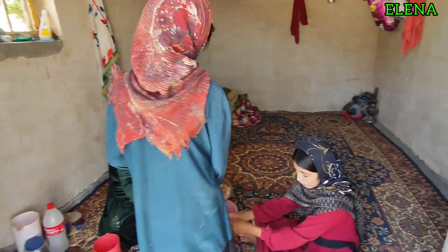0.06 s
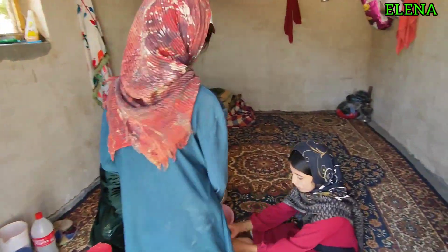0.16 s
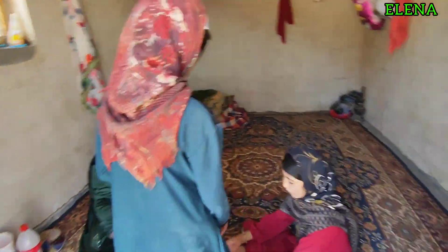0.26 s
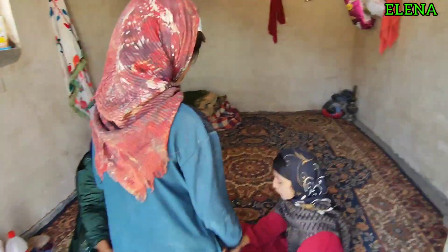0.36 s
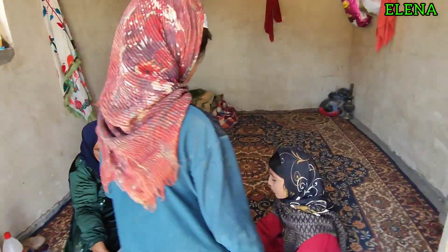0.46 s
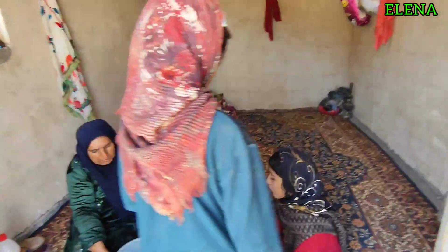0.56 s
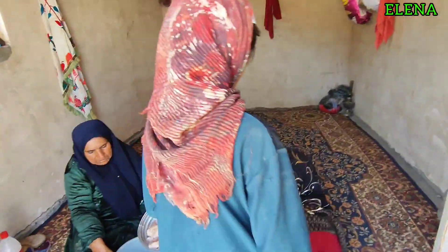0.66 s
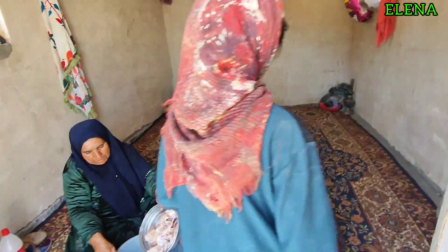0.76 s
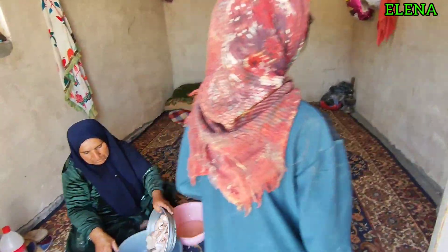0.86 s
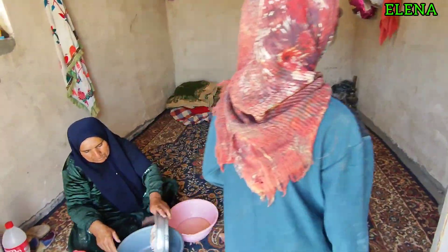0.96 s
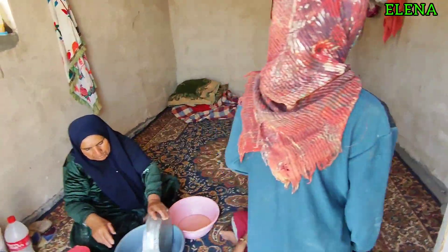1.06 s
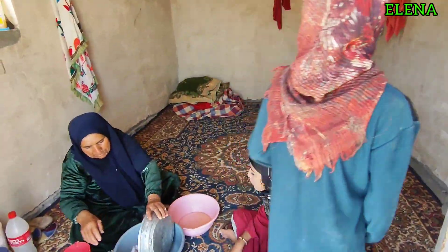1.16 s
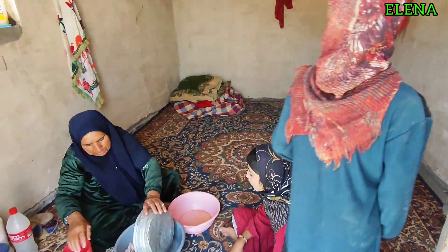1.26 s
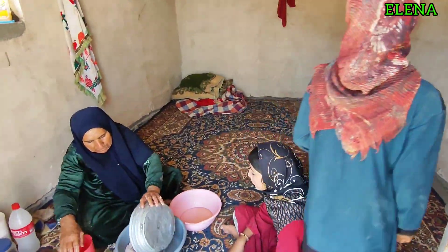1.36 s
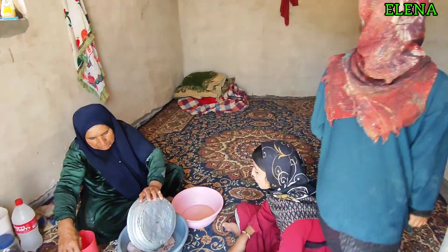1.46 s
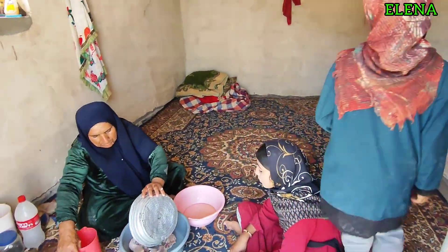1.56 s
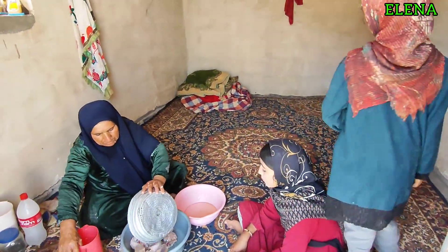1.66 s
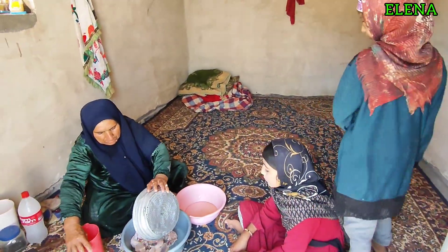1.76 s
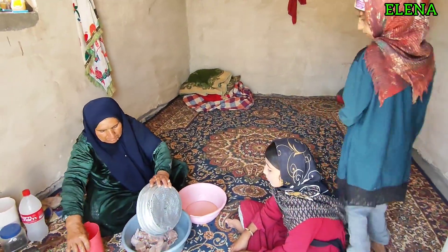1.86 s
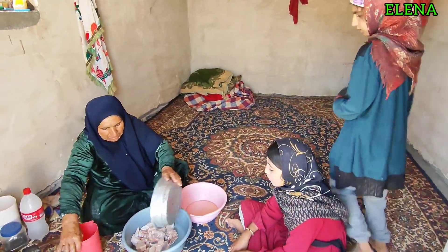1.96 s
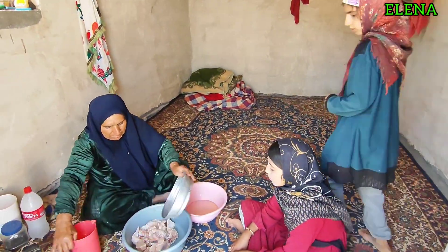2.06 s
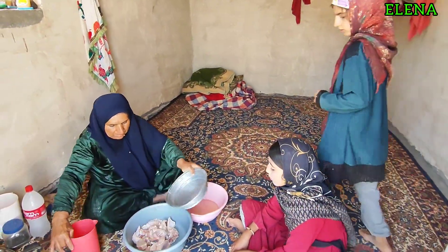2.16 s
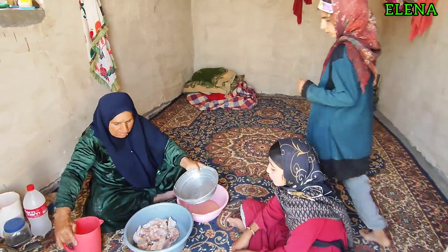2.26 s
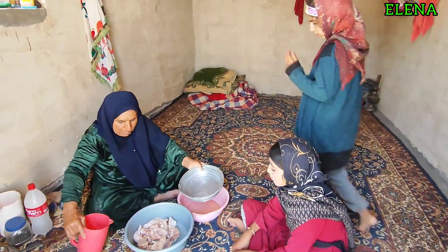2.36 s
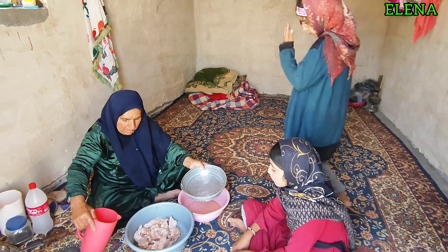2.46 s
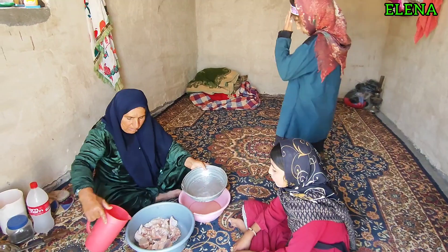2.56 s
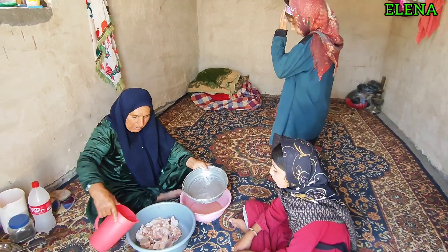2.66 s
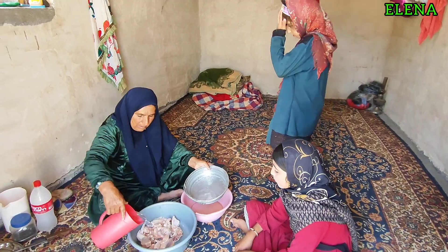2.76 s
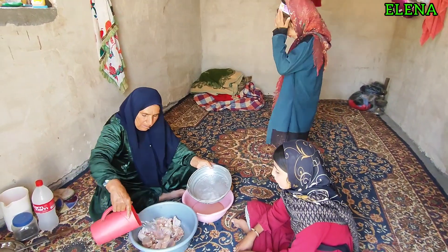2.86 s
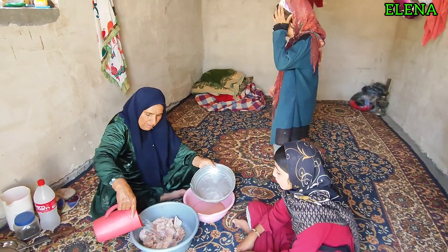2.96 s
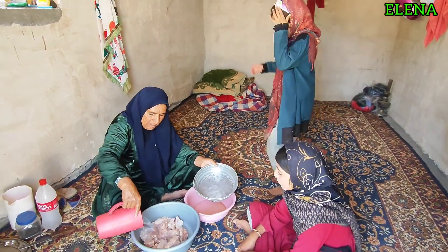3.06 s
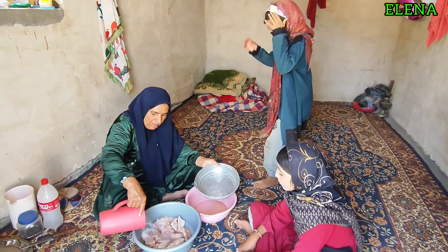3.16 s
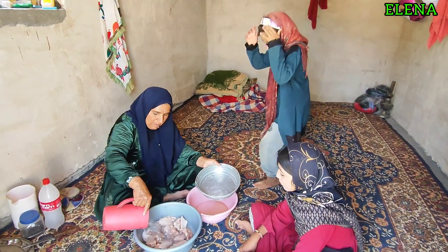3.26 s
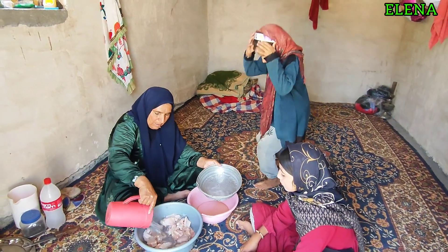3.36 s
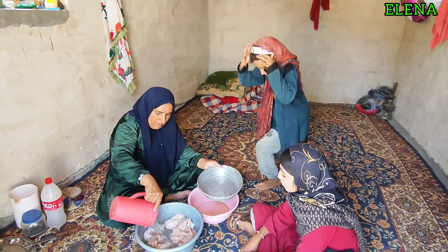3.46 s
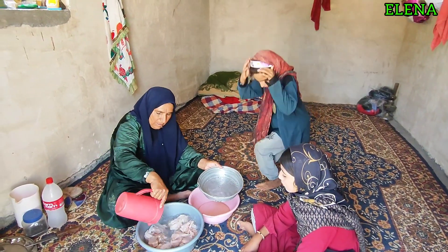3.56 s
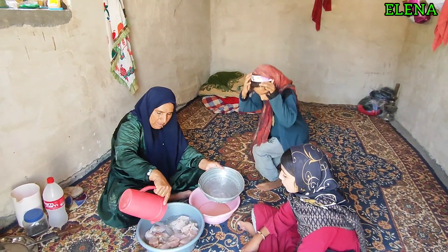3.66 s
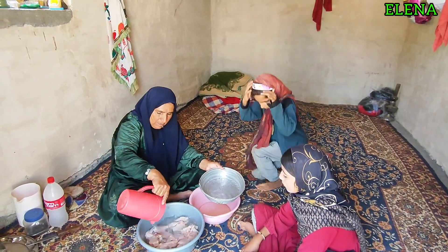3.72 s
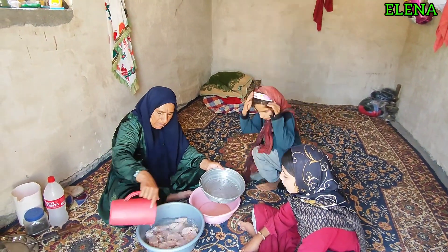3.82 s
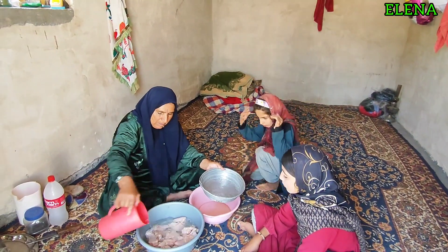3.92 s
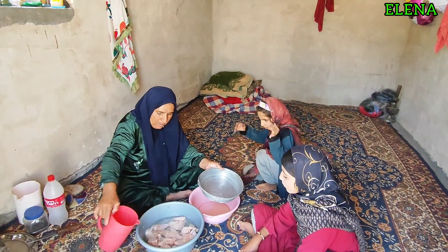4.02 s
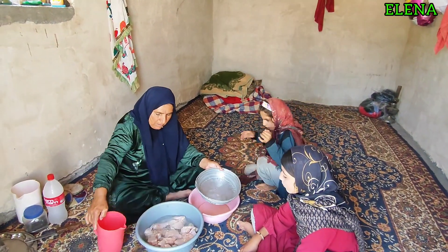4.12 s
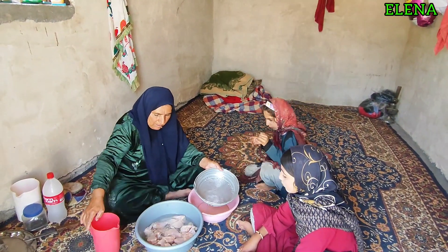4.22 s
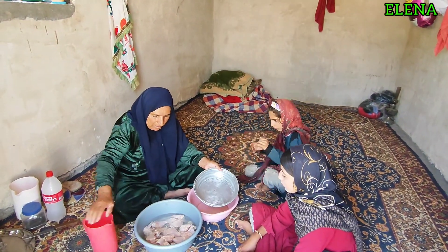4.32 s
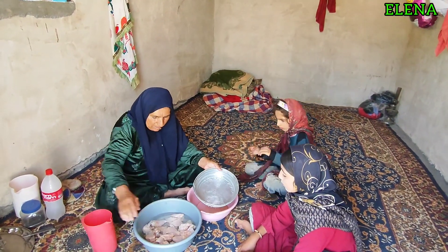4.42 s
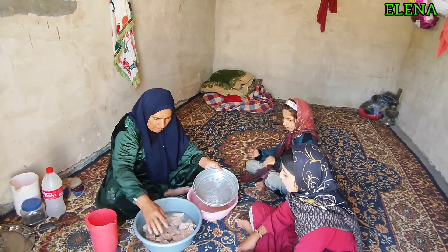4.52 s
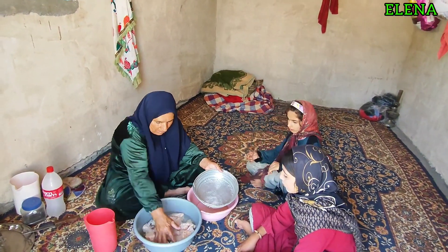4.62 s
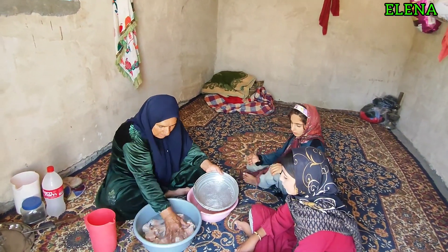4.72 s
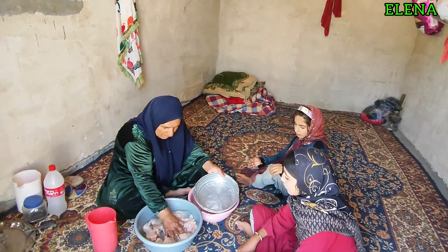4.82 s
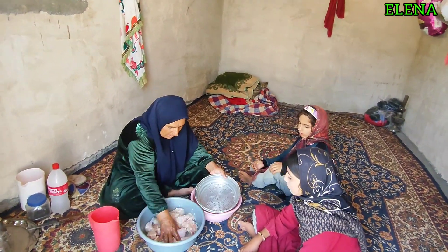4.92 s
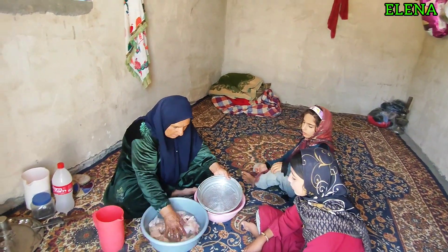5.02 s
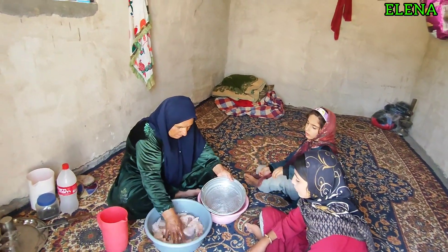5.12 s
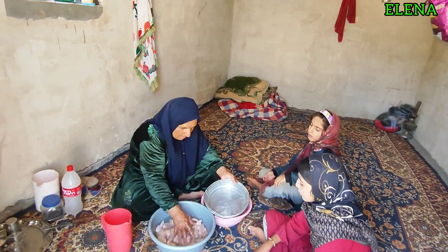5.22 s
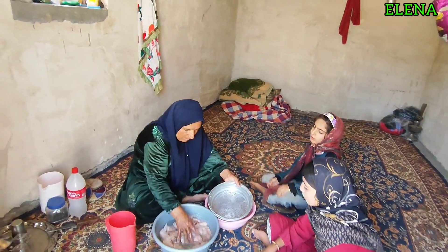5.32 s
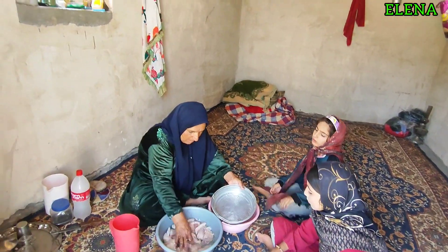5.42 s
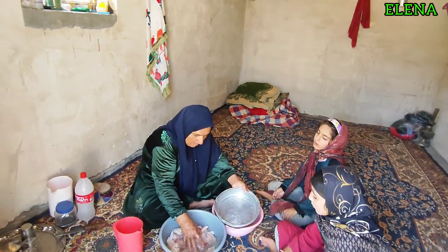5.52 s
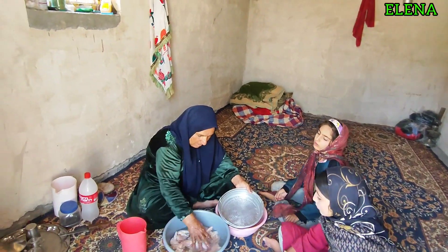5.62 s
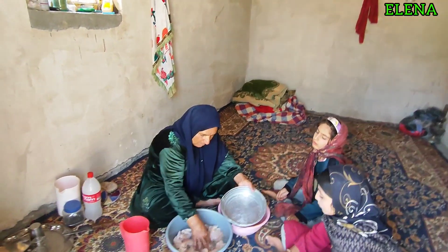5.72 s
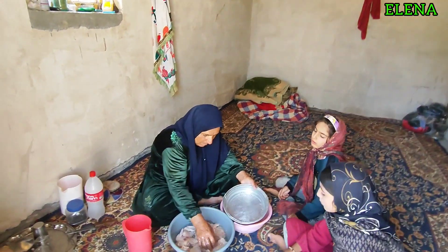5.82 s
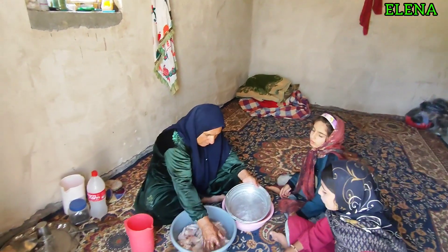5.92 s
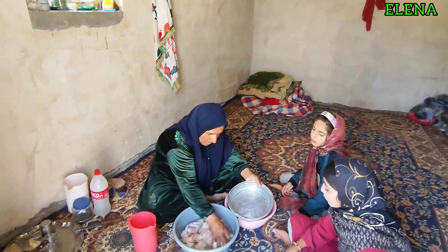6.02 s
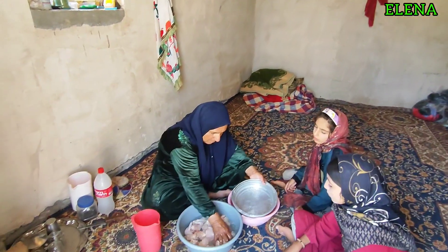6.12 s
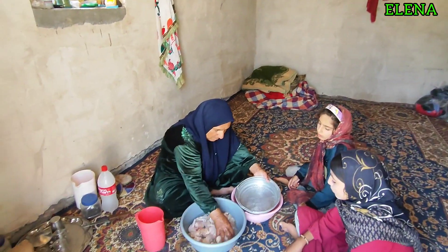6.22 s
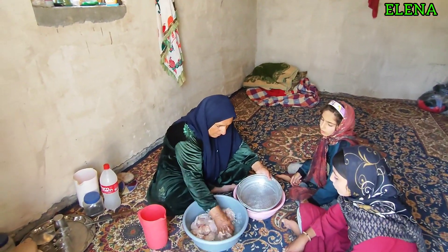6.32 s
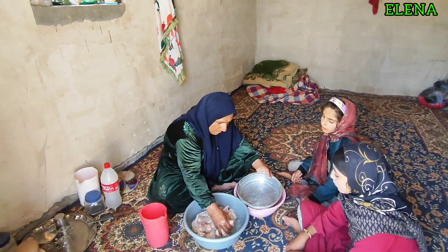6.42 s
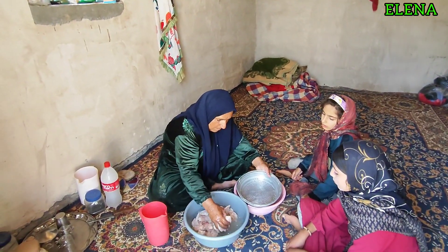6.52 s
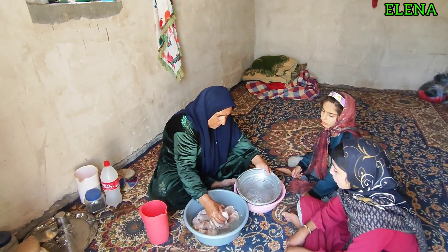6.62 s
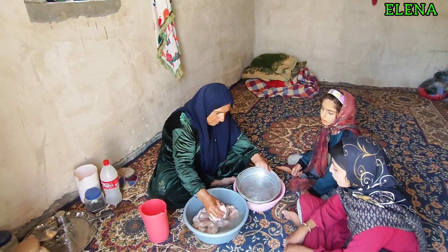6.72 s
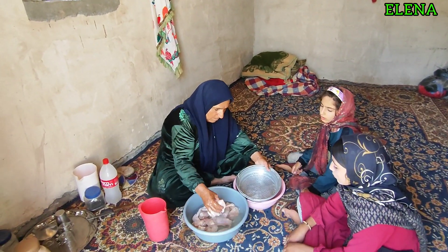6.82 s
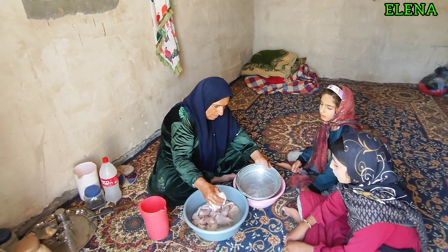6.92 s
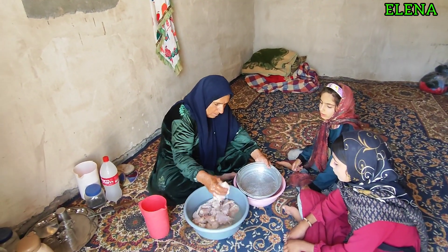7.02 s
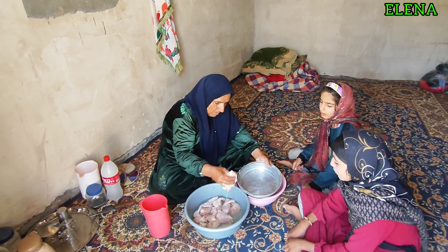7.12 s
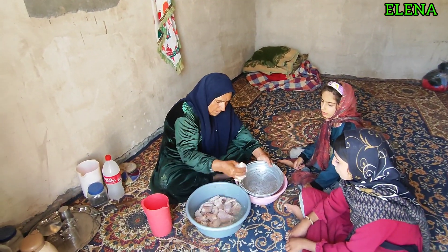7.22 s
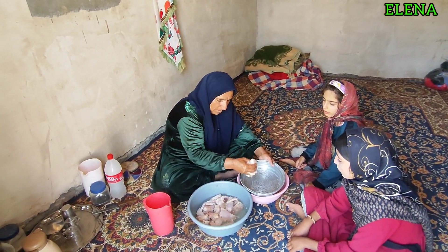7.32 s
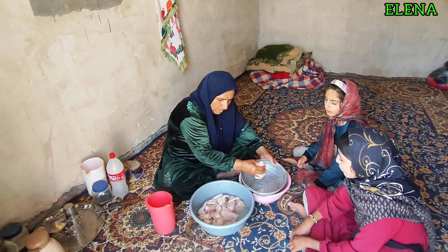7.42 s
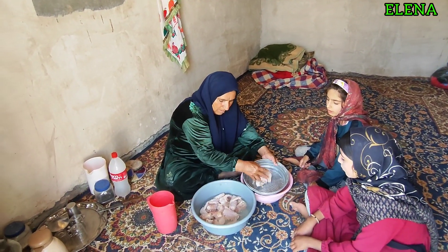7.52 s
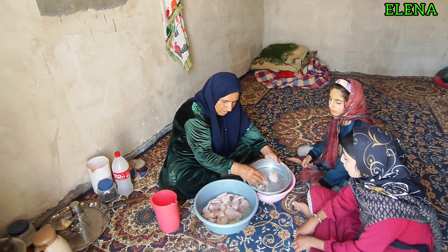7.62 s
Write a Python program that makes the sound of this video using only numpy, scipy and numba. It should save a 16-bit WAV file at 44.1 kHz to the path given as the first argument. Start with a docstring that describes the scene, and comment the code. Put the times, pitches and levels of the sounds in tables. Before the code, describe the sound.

In a small bare room, heard close in stereo, a steel bowl clanks, thumps and scrapes on a plastic basin while soft steps pass on carpet. A jug pours a short bubbling stream over meat and is set down with a dull knock. A hand then sloshes the water in irregular bursts, with plops and fine spray, calming to drips before a last bright metal knock.

```python
"""Water poured and sloshed by hand over meat in a plastic basin, on the carpet of a small bare room, heard close
through two microphone ports: crowds of short rings that climb in pitch, single bubbles, slaps and treble puffs.
A steel bowl knocks and thumps the basin (clicks striking modes) and slides on it (crowds of steady rings).
The jug is set down and soft footfalls pass; dense echoes and a flickering hush of noise lie behind."""
import sys
import numpy as np
from scipy import signal
from scipy.fft import rfft, irfft, next_fast_len
from scipy.io import wavfile
from numba import njit

SR = 44100
rng = np.random.default_rng(int(sys.argv[2]) if len(sys.argv) > 2 else 0)


def wrap_up_sound(samples):
    """Save the sound to the file named by the first command line argument, as 16-bit audio."""
    columns = np.atleast_2d(samples).T
    # keep every value between -1 and 1, then stretch to whole-number steps
    tamed = np.clip(columns, -1, 1)
    steps = np.round(tamed * 32767).astype(np.int16)
    wavfile.write(sys.argv[1], SR, steps)


def linear_from_db(decibels):
    """Turn decibels (scalar or array-like) into linear amplitude factors; 0 gives 1."""
    return 10 ** (np.asarray(decibels, float) / 20)


N = 338688   # samples, 7.68 s

# Levels of the sources are those before the direct gain in scene().
# Hush of the room. Each row: frequency in Hz, relative level in dB per Hz.
HUSH_COLOUR = [(15, -35), (25, -4), (71, 0.5), (157, 1), (387, -7.5), (505, -6.5), (1040, -16),
               (2430, -15.5), (3080, -22), (4240, -17.5), (6670, -22), (7620, -16.5), (9180, -7.5),
               (11700, -20), (14400, -16.5)]
# Level of the treble hiss, which rises and falls with the scraping and the water.
# Each row: time in seconds, level in dB.
HISS_LEVEL = [(0.0, -67.5), (0.9, -69), (1.07, -58), (1.22, -52.5), (1.32, -67.5), (2.35, -74.5),
              (2.84, -74.5), (3.06, -61), (3.57, -59.5), (4.0, -62.5), (4.62, -64.5), (5.0, -62),
              (5.92, -66), (6.22, -65), (6.56, -70), (7.0, -68.5), (7.68, -71)]
# Likeness of the hush at the two ports. Each row: frequency in Hz, left-right likeness from 0 to 1.
PORT_LIKENESS = [(60, 0.43), (150, 0.83), (370, 0.69), (920, 0.078), (2270, 0.06), (5640, 0.033),
                 (14000, 0.02)]
# Echoes of the small room. Each row: frequency in Hz, decay by 60 dB in seconds.
ROOM_T60 = [(100, 0.33), (500, 0.21), (2000, 0.17), (8000, 0.078)]
# The microphone turns slowly. Each row: time in seconds, delay of the right port in seconds.
RIGHT_LAG = [(0, 0.00016), (1.5, 0.00013), (2.2, 0.0005), (3.4, 0.0004), (4.5, 0.00022), (5.5, 0.00013),
             (7.68, 0.000011)]
# Colour of the microphone, with the top cutoff of the whole sound above 14.4 kHz.
# Each row: frequency in Hz, gain in dB.
MICROPHONE_AND_CUTOFF = [(100, 0.5), (6300, 0.5), (7700, -11.5), (8700, -7.5), (9400, -0.5), (10600, -4.5),
                         (11900, 0), (13200, -6), (14300, -2), (14700, -46)]
# Balance of the ports. Each row: frequency in Hz, left minus right in dB.
PORT_BALANCE = [(60, 1.5), (98, 2), (160, -1), (270, 1), (440, -5), (710, 2.5), (1170, 0), (1930, -2.5),
                (3160, -3.5), (5190, 2), (8520, -12), (14000, -5.5)]

# Soft footfalls on the carpet. Each row: start in seconds, peak in dB, length in seconds, centre in Hz.
FOOTFALLS = [(1.291, -45.5, 0.03, 45.8), (1.929, -56.5, 0.081, 99.6), (2.264, -54.5, 0.05, 53.8),
             (3.775, -51, 0.048, 56.5), (3.869, -71, 0.05, 99.6), (4.074, -47.5, 0.072, 93),
             (7.582, -49, 0.039, 53.5), (7.63, -57, 0.05, 48.4)]
# Jug set down. Each row: start in seconds, peak in dB, rattle length in seconds, contact centre in Hz.
JUG_KNOCKS = [(4.053, -51, 0.001, 380), (4.197, -27.5, 0.00061, 346), (4.226, -29.5, 0.0011, 358)]
# Modes of the jug. Each row: frequency in Hz, relative level in dB, decay by 60 dB in seconds.
JUG_MODES = [(91, -25, .2), (124, 10.5, 0.17), (176, -8, 0.082), (240, 1.5, 0.056), (294, -14, 0.089),
             (361.5, 13.5, 0.11), (427, -8, 0.28)]
# Basin thumps. Each row: start in seconds, peak in dB, rattle length in seconds, contact centre in Hz.
BASIN_KNOCKS = [(0.245, -27.5, 0.0073, 254), (0.379, -22.5, 0.0031, 230), (0.459, -34.5, 0.0044, 334),
                (0.62, -48, 0.0038, 460), (1.115, -25, 0.0031, 268), (1.136, -28, 0.0075, 205),
                (1.168, -33, 0.0053, 494), (1.466, -31.5, 0.0023, 338), (2.722, -46.5, 0.0056, 490)]
# Modes of the basin. Each row: frequency in Hz, relative level in dB, decay by 60 dB in seconds.
BASIN_MODES = [(125.2, -0.5, 0.3), (183, 5, 0.087), (216.8, -2.5, 0.34), (239, 6, 0.15), (308.7, 1, 0.09),
               (348, 9, 0.039), (427, -21, 0.27), (653, -5, 0.048), (890, -12, 0.06)]
# Steel bowl knocks. Each row: start in seconds, peak in dB, rattle length in seconds, contact centre in Hz.
BOWL_KNOCKS = [(0.248, -20.5, 0.009, 1200), (0.867, -30.5, 0.034, 3070), (0.903, -21, 0.0045, 525),
               (0.97, -27.5, 0.0032, 590), (1.085, -32.5, 0.0089, 1340), (1.138, -20, 0.0028, 1050),
               (1.176, -35, 0.008, 511), (1.207, -26, 0.0092, 1100), (1.467, -37, 0.0046, 470),
               (1.737, -45, 0.0059, 1400), (2.717, -35.5, 0.0061, 910), (7.56, -19, 0.009, 2080),
               (7.616, -26.5, 0.0052, 520)]
# Modes of the bowl. Each row: frequency in Hz, relative level in dB, decay by 60 dB in seconds.
BOWL_MODES = [(499, 0, 0.12), (536, -1, 0.1), (642, -10, 0.17), (860, -24, 0.11), (983, -7, 0.038),
              (1157, 3.5, 0.032), (1400, -1.5, 0.03), (1620, -10, 0.057), (2230, -19, 0.032),
              (2490, -7, 0.026), (2570, -17, 0.033), (3040, -10.5, 0.094), (3110, -4.5, 0.048),
              (3900, -23, 0.028), (4510, 7.5, 0.012), (5700, -48, 0.023), (6700, -22, .03)]

# Bowl and wet meat slide. Each row: start in seconds, hold in seconds, level in dB,
# decay by 60 dB in seconds, brightness in dB.
SLIDES = [(.245, 0.0089, -30, 0.19, -0.7), (.38, .005, -43, 0.077, -8), (.4, 0.13, -51.5, 0.31, -2),
          (.61, 0.011, -58, 0.54, 0), (.865, 0.024, -57, 0.064, 20.5), (.903, 0.0042, -34, 0.13, -6),
          (.966, 0.0045, -38.5, 0.19, -1), (1.0, 0.036, -57.5, .3, 11), (1.04, 0.044, -56, 0.23, 15.5),
          (1.082, .02, -50, 0.27, 6), (1.135, 0.0044, -43.5, 0.43, -16), (1.15, 0.056, -38.5, 0.29, -0.8),
          (1.33, 0.052, -60, .3, 2.5), (1.462, .005, -56.5, 0.85, 0.1), (1.595, 0.0071, -67, 0.21, 21.5),
          (1.63, 0.017, -59.5, 0.53, -10.5), (1.71, 0.032, -55, 0.13, 8.5), (1.735, 0.0034, -42, 0.093, -1),
          (1.85, 0.205, -68, 0.24, 7), (2.085, .005, -67, .08, 16.5), (2.15, 0.055, -64.5, 0.21, 11),
          (2.25, 0.17, -72, 0.49, -1), (2.715, 0.0038, -44.5, 0.12, 1), (7.493, .01, -55.5, 0.22, 10),
          (7.555, 0.0038, -32, 0.15, 3), (7.61, 0.026, -48.5, 0.2, -3)]
# Basin body, middle, steel scrape, wet hiss. Each row: dB against the stroke level, share of the brightness.
SLIDE_RANGES = [(-5, -0.67), (0, 0.067), (-6.5, 1.01), (-14, 1.25)]
# Colour of the sliding. Each row: frequency in Hz, relative level in dB per Hz.
SLIDING_COLOUR = [(71, -34), (120, 1), (302, 1), (805, -3), (984, -30), (1180, -10), (1590, -13.5),
                  (6100, -37.5), (7600, -42), (12000, -50.5), (14400, -38)]

# Water slapping on meat and basin wall. Each row: start in seconds, peak in dB, length in seconds, centre in Hz.
SLAPS = [(2.899, -36.5, 0.0086, 1990), (2.983, -34, .016, 2160), (3.255, -32.5, .012, 1900),
         (3.39, -39, .008, 2300), (3.707, -37, .017, 1920), (4.882, -53, .014, 880),
         (5.016, -35, .0078, 2190), (5.049, -33, .0088, 1890), (5.327, -34.5, 0.013, 2170),
         (5.377, -36, 0.0032, 800), (5.422, -38, 0.021, 1810), (5.683, -36, .008, 4500),
         (5.914, -39, 0.025, 1190), (6.099, -32.5, 0.0092, 910), (6.271, -21, 0.0056, 4600),
         (6.437, -44, 0.013, 802), (7.431, -42.5, 0.0011, 1080)]
# Short treble puffs, mostly fine spray, some from the bowl scraping and knocking.
# Each row: start in seconds, peak in dB.
TREBLE_PUFFS = [(1.7114, -45), (2.1833, -45.5), (2.878, -44), (3.075, -36.5), (3.403, -40), (3.694, -39),
                (3.996, -42), (4.717, -38), (4.83, -43), (4.877, -38.5), (4.96, -44), (5.013, -34),
                (5.124, -42), (5.182, -35.5), (5.33, -42), (5.3781, -38.5), (5.407, -30), (5.631, -38),
                (5.69, -42), (5.771, -39.5), (6.0735, -44.5), (6.165, -36), (6.27, -23), (6.465, -46),
                (6.56, -44.5), (6.714, -50), (6.75, -48), (7.037, -48), (7.177, -44.5), (7.357, -40),
                (7.4935, -34.5), (7.555, -26)]
# Single bubbles and drops. Each row: start in seconds, level before decay in dB,
# pitch a fifth of the way through the ring in Hz, decay by 60 dB in seconds.
BUBBLES = [(2.792, -46, 1260, 0.023), (2.8577, -44.5, 4160, 0.063), (2.8987, -34, 2080, 0.059),
           (2.991, -36.5, 800, .076), (3.2595, -30, 2030, 0.026), (3.3502, -37.5, 2660, 0.034),
           (3.394, -35, 2570, .028), (3.401, -30, 847, 0.057), (3.61, -39.5, 2780, 0.055),
           (3.67, -40, 598, 0.08), (3.7083, -32.5, 1960, .028), (3.745, -34.5, 2630, 0.042),
           (3.85, -44.5, 4060, 0.054), (4.702, -33, 377, 0.048), (4.7823, -36, 1340, .033),
           (4.8396, -33, 1750, .04), (4.93, -36, 3200, 0.046), (4.888, -31.5, 462, 0.062),
           (5.009, -31, 528, 0.023), (5.011, -31.5, 970, 0.038), (5.0173, -31, 2230, .04),
           (5.049, -25.5, 1930, 0.022), (5.126, -31, 375, 0.04), (5.145, -43, 4180, .054),
           (5.3635, -45, 2020, .043), (5.377, -39.5, 844, 0.13), (5.4174, -40, 1850, .067),
           (5.4927, -33, 3400, .032), (5.569, -43, 487, 0.05), (5.597, -44, 1840, .033),
           (5.629, -34.5, 1830, 0.096), (5.7581, -44, 1855, 0.072), (5.775, -43, 2500, 0.064),
           (5.81, -40, 2820, 0.043), (5.8514, -40.5, 1990, 0.023), (5.911, -21, 456, 0.027),
           (5.9144, -44, 1296, 0.078), (5.9661, -45, 2510, 0.032), (6.072, -23, 376, 0.031),
           (6.1225, -35, 1800, 0.033), (6.2133, -33.5, 1556, .049), (6.249, -38, 904, .059),
           (6.2585, -35, 1860, 0.037), (6.558, -45.5, 1857, 0.1), (6.816, -46, 2840, 0.027),
           (6.918, -61, 2500, 0.023), (6.954, -47.5, 2740, 0.048), (7.0352, -53, 4580, .04),
           (7.0866, -53, 2850, 0.11), (7.1732, -53, 1410, .019)]
# Stream from the jug. Each row: time in seconds, level in dB,
# then against that level: large bubbles in dB, fizz in dB.
POUR = [(2.8, -81, 0.1, -9), (2.85, -64, -18, 5), (2.9, -48, -12.5, -4.5), (2.98, -46, -3, -4),
        (3.06, -45, -14, -10), (3.14, -43.5, -10, -10.5), (3.25, -47, -1.5, -12), (3.37, -46.5, -5, -10),
        (3.47, -46, -1.5, -8), (3.56, -49.5, -4, -16.5), (3.72, -46, -6.5, -4.5), (3.78, -51.5, -14, -1),
        (3.86, -59, -11, -8), (4.0, -66.5, -0.5, -18), (4.25, -81, 3, 16)]
# The water surges, first under the stream, then under the hand. Each row: start in seconds, hold in seconds,
# level in dB, decay by 60 dB in seconds, brightness in dB.
SLOSHES = [(2.79, 0.013, -69.5, 0.12, -25.5), (3.385, 0.016, -40.5, 0.3, 0), (3.7, 0.016, -51.5, 0.26, -5),
           (4.62, 0.19, -58.5, .3, 7), (4.7, 0.094, -51, .3, -3), (4.835, 0.043, -45.5, 0.23, 5.5),
           (4.88, 0.021, -43.5, 1.02, -2), (5.0, 0.037, -44, 0.29, 2.8), (5.12, .07, -48, 1.5, 1),
           (5.3, .005, -50, 0.16, -6.5), (5.36, 0.031, -45, .3, 3.5), (5.41, 0.023, -45, 0.34, 2.5),
           (5.53, 0.078, -56.5, .3, 2), (5.628, 0.004, -49, 0.061, 3), (5.68, 0.036, -50.5, 0.092, 5.5),
           (5.73, .14, -59.5, .07, 1.5), (5.91, 0.07, -54.5, 0.71, -9.5), (6.0, 0.092, -50, 0.59, 2),
           (6.09, 0.075, -47.5, 0.23, -9), (6.2, 0.046, -48.5, .3, 0.5), (6.24, 0.035, -42.5, .45, -3.5),
           (6.33, 0.038, -51.5, .45, 2.5), (6.435, 0.12, -58.5, 0.14, -6), (6.81, 0.016, -64, 0.098, 8),
           (6.95, 0.014, -63, 0.085, 8), (7.09, .04, -62, 0.33, 11), (7.2, 0.038, -76, 0.36, -25.5),
           (7.35, .02, -73, .2, 18)]
# Large bubbles, middle, fizz, finest fizz. Each row: dB against the surge level, share of the brightness.
SLOSH_RANGES = [(-6.5, -0.97), (-1, -0.24), (-10.5, 1), (-13, 0.72)]
# Colour of the water. Each row: frequency in Hz, relative level in dB per Hz.
WATER_COLOUR = [(150, -38), (250, -7.5), (470, -6), (760, -7), (1500, -5), (2000, -5.5), (3500, -10.5),
                (4200, -12), (5000, -17.5), (8000, -13.5), (14400, -22), (15000, -40)]

EDGES_HZ = 25 * 2 ** np.arange(0, 9.6, .5)   # half-octave bands


def rms_one(x):
    """Scales a signal to an rms of one."""
    return x / np.sqrt(np.mean(x ** 2) + 1e-20)


def at_hz(points, hz):
    """Reads a table at a frequency, along a logarithmic frequency axis."""
    table = np.array(points)
    return np.interp(np.log(hz), np.log(table[:, 0]), table[:, 1])


def band(x, low_hz, high_hz):
    """Keeps the sound between two frequencies."""
    return signal.sosfilt(signal.butter(2, [low_hz, high_hz], "band", fs=SR, output="sos"), x)


def over_time(s, values, outside=None):
    """Joins timed values by lines, one value per sample."""
    return np.interp(np.arange(N) / SR, s, values, outside, outside)


def drift(rate):
    """Slow random wander of rms one: rate random points a second, joined by lines."""
    count = int(N / SR * rate) + 2
    return rms_one(over_time(np.arange(count) / rate, rng.standard_normal(count)))


def lag_at(s, spread_s):
    """Samples by which the right port is late, for sources spread over the width of the basin."""
    lag_s = np.interp(s, *np.transpose(RIGHT_LAG)) + spread_s * (2 * rng.random(np.shape(s)) - 1)
    return np.clip(np.round(lag_s * SR), -40, 40).astype(int)


def hush():
    """Half-octave bands of flickering noise; the treble hiss rises and falls with the scraping and the water."""
    rumble_db, middle_db = -61, -65
    levels = [linear_from_db(rumble_db), linear_from_db(middle_db), linear_from_db(over_time(*np.transpose(HISS_LEVEL)))]
    zones = np.zeros((3, 2, N))
    white = rng.standard_normal((2, 2, N))
    for k, (low, high) in enumerate(zip(EDGES_HZ, EDGES_HZ[1:])):
        mid, side = band(white[k % 2], low, high)
        hz = np.sqrt(low * high)
        alike = np.clip(at_hz(PORT_LIKENESS, hz), -1, 1)
        ports = np.sqrt(1 + alike) * mid + np.sqrt(1 - alike) * side * [[1], [-1]]
        flicker_db = 2.04 * drift(8.3)
        zones[np.digitize(hz, [250, 5000])] += linear_from_db(at_hz(HUSH_COLOUR, hz) + flicker_db) * ports
    return sum(level * zone / np.std(zone.mean(axis=0)) for level, zone in zip(levels, zones))


def room(x):
    """Dense echoes: noise that dies band by band at each port, building up over the first milliseconds."""
    alike_below_hz, build_up_s = 600, 0.0077
    t = np.arange(SR // 2) / SR
    white = rng.standard_normal((2, len(t)))
    # long waves reach both ports alike
    white[1] += signal.lfilter(*signal.butter(2, alike_below_hz, fs=SR), white[0] - white[1])
    tail = np.zeros((2, len(t)))
    for low, high in zip(EDGES_HZ[2::2], EDGES_HZ[4::2]):
        t60 = at_hz(ROOM_T60, low)
        tail += band(white, low, high) * linear_from_db(-60 * t / t60) / np.sqrt(t60)
    tail *= np.minimum(t / build_up_s, 1)
    tail /= np.sqrt(np.sum(tail ** 2, axis=1, keepdims=True))
    return signal.fftconvolve(x[None], tail, axes=1)[:, :N]


def knocks(events, modes, density, octaves, crack_db, swell_s=0):
    """Each blow is a short rattle of clicks, coloured by the contact, that cracks and strikes any modes."""
    out = np.zeros((2, N + SR))
    t = np.arange(SR // 4) / SR
    for s, peak_db, rattle_s, centre_hz in events:
        clicks = rng.standard_normal(len(t)) * (rng.random(len(t)) < density)
        rattle = clicks * np.exp(-t / max(rattle_s, .0005))
        rattle[0] = 2
        rattle *= np.minimum((t + 1 / SR) / (swell_s + 1 / SR), 1)   # splashes arrive gradually, solids at once
        rattle = band(rattle, centre_hz / 2 ** octaves, min(centre_hz * 2 ** octaves, .4 * SR))
        body = np.zeros(len(t))
        for hz, db, t60 in modes:
            # grip and load change the modes a little from blow to blow
            gain = linear_from_db(db + rng.normal(0, 2.2))
            body += gain * np.sin(2 * np.pi * hz * rng.normal(1, 0.0082) * t) * linear_from_db(-60 * t / t60)
        body[0] = linear_from_db(crack_db)
        blow = signal.fftconvolve(rattle, body)[:len(t)]
        blow *= linear_from_db(peak_db) / np.abs(blow).max()
        for port, at in zip(out, round(s * SR) + np.array([0, lag_at(s, spread_s=.0001)])):
            port[at:at + len(t)] += blow
    return out[:, :N]


def footfalls():
    """Soft steps on the carpet are low puffs of clicks without a ringing body."""
    return knocks(FOOTFALLS, [], density=0.75, octaves=0.81, crack_db=0)


def jug_set_down():
    """The plastic jug is set down: very short rattles strike its low modes."""
    return knocks(JUG_KNOCKS, JUG_MODES, density=.02, octaves=.75, crack_db=12.)


def basin_thumps():
    """Sparse low clicks strike the modes of the plastic basin."""
    return knocks(BASIN_KNOCKS, BASIN_MODES, density=0.043, octaves=0.88, crack_db=7.0)


def bowl_knocks():
    """The steel bowl knocks on the basin: a strong crack over the ringing modes of the bowl."""
    return knocks(BOWL_KNOCKS, BOWL_MODES, density=.12, octaves=0.64, crack_db=30.0)


def strokes(rows, ranges, attack_s):
    """Gain of each pitch range: every stroke climbs 30 dB in the attack, holds and dies; powers add."""
    t = np.arange(0, N, 32) / SR
    power = 1e-14
    range_db, share = np.transpose(ranges)[:, :, None]
    for s, hold_s, level_db, t60, bright_db in rows:
        since_attack = t - s - attack_s
        climb_db = np.minimum(30 * since_attack / attack_s, 0)
        fall_db = 60 * np.maximum(since_attack - hold_s, 0) / max(t60, .02)
        power = power + linear_from_db(level_db + range_db + share * bright_db + climb_db - fall_db) ** 2
    return np.array([over_time(t, row) for row in np.sqrt(power)])


@njit
def add(out, at, lag, hz, size, t60, rise, sr):
    """Each grain is a sine that swells for a cycle, dies and climbs by the share rise; the right port lags."""
    for k in range(len(at)):
        steps = t60[k] * sr
        phase, fade = 0., np.exp(-np.log(1000) / steps)
        height = size[k]
        for i in range(at[k], min(at[k] + int(steps), out.shape[1] - 64)):
            phase += 2 * np.pi * hz[k] * (1 + rise[k] * (i - at[k]) / steps) / sr
            value = height * np.sin(phase) * min(phase / (2 * np.pi), 1.)
            out[0, i] += value
            out[1, i + lag[k]] += value
            height *= fade


def grains(gains, colour, per_s, mid_hz, cycles, spread_db, clump_db, rise):
    """A crowd of short rings, small ones more numerous; the gains set how strong each range of pitch is."""
    when, pitch, chance, length = rng.random((int(per_s * N / SR), 4)).T
    when = when * N / SR
    at = (when * SR).astype(int)
    lowest_hz, highest_hz = colour[1][0], colour[-2][0]
    hz = lowest_hz * (highest_hz / lowest_hz) ** pitch ** .7
    size = linear_from_db(at_hz(colour, hz) - spread_db * np.log(np.maximum(chance, .014))) * hz ** 0.89
    size *= linear_from_db(clump_db * drift(30)[at])   # the crowd comes in gulps
    # cycles counts the typical ring at 1 kHz; higher grains ring more cycles
    t60 = cycles * (.5 + length) / np.sqrt(hz * 1000)
    lag = lag_at(when, spread_s=.0003)
    zone = np.digitize(hz, mid_hz)
    heard = gains.max(axis=0) > linear_from_db(-90)
    out = np.zeros((2, N))
    for k, gain in enumerate(gains):
        part = np.zeros((2, N))
        mine = (zone == k) & heard[at]
        add(part, at[mine], lag[mine], hz[mine], size[mine], t60[mine], np.full(mine.sum(), rise), SR)
        out += part / np.std(part[:, heard]) * gain
    return out


def sliding():
    """Bowl and wet meat slide on the basin: strokes of a crowd of short rings at steady pitch."""
    gains = strokes(SLIDES, SLIDE_RANGES, attack_s=0.0033)
    return grains(gains, SLIDING_COLOUR, per_s=6000, mid_hz=[700, 2000, 6000],
                  cycles=8.5, spread_db=3., clump_db=2.0, rise=0.)


def splashes():
    """Slaps and short treble puffs (mostly spray, some from the bowl) are clicks without a ringing body."""
    puff_s, puff_hz = 0.0057, 9750
    start_s, end_s, faint_db = 5.2, 7.45, -46.5   # ten fainter puffs at random, within 3 dB of this peak
    when, size = rng.random((10, 2)).T
    faint = zip(start_s + when * (end_s - start_s), faint_db + 6 * (size - .5))
    puffs = [(s, db, puff_s, puff_hz) for s, db in list(TREBLE_PUFFS) + list(faint)]
    return (knocks(SLAPS, [], density=0.36, octaves=0.68, crack_db=0, swell_s=0.00078)
            + knocks(puffs, [], density=0.69, octaves=0.4, crack_db=0, swell_s=0.003))


def bubbles():
    """Single air pockets ring and climb in pitch as they near the surface."""
    rise = 0.32   # share of the starting pitch
    s, level_db, hz, t60 = np.transpose(BUBBLES)
    out = np.zeros((2, N))
    add(out, (s * SR).astype(int), lag_at(s, spread_s=.0001), hz / (1 + rise / 5), linear_from_db(level_db), t60,
        np.full(len(s), rise), SR)
    return out


def stream():
    """Gain of each pitch range while the jug pours."""
    finest_db = -1.5   # against the fizz
    s, level_db, large_db, fizz_db = np.transpose(POUR)
    ranges_db = [large_db, 0 * s, fizz_db, fizz_db + finest_db]
    return linear_from_db(np.array([over_time(s, level_db + db, outside=-140) for db in ranges_db]))


def water():
    """Air dragged under by the stream and the surges: a crowd of bubbles that climb in pitch as they ring."""
    gains = np.hypot(stream(), strokes(SLOSHES, SLOSH_RANGES, attack_s=0.0059))
    return grains(gains, WATER_COLOUR, per_s=7000, mid_hz=[1000, 4500, 8000],
                  cycles=40.6, spread_db=4.0, clump_db=1.74, rise=.3)


def scene():
    """The basin close to the microphone, its echoes from the left port's sound, and the hush."""
    direct_db, room_db = -2, -4
    blows = footfalls() + jug_set_down() + basin_thumps() + bowl_knocks()
    near = linear_from_db(direct_db) * (blows + sliding() + splashes() + bubbles() + water())
    return hush() + linear_from_db(room_db) * room(near[0]) + near


def roll_off(x):
    """The treble ends steeply here."""
    return signal.sosfilt(signal.butter(12, 14580, fs=SR, output="sos"), x)


def record(dry):
    """The ports share a dip in the lower treble and a top cutoff; the right one favours the upper treble."""
    size = next_fast_len(N)
    hz = np.arange(1, size // 2 + 2) * SR / size
    half_db = at_hz(PORT_BALANCE, hz) / 2
    port_gains = linear_from_db(at_hz(MICROPHONE_AND_CUTOFF, hz) + [half_db, -half_db])
    coloured = irfft(rfft(dry, size) * port_gains, size)[:, :N]
    return roll_off(coloured)


dry = scene()
out = record(dry)
wrap_up_sound(out)
```